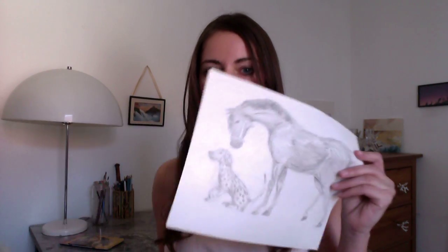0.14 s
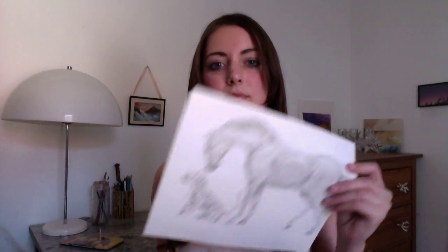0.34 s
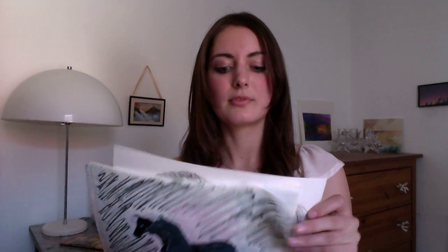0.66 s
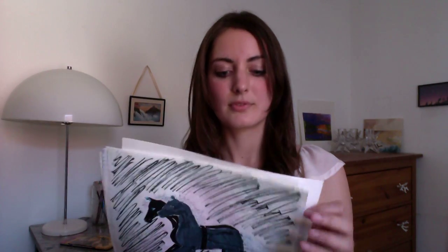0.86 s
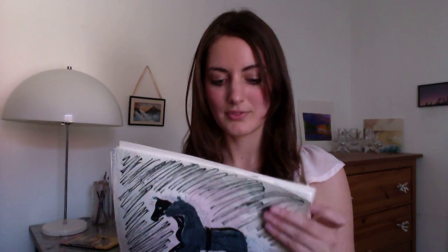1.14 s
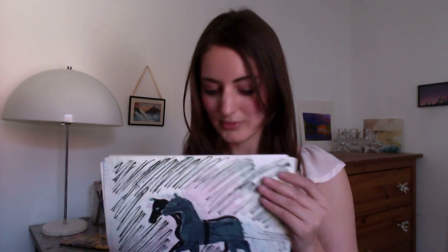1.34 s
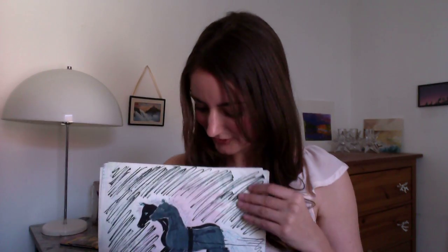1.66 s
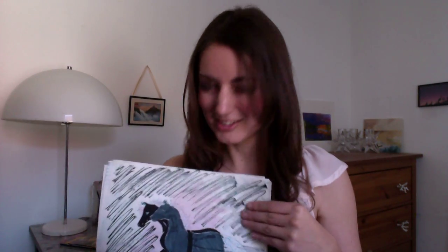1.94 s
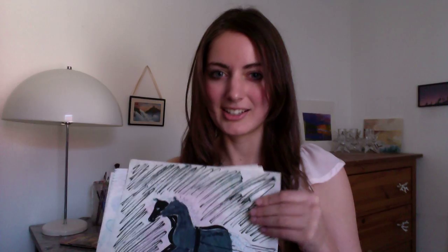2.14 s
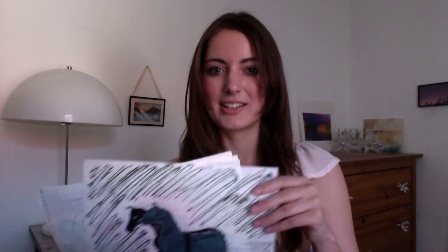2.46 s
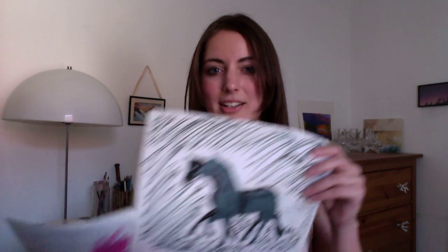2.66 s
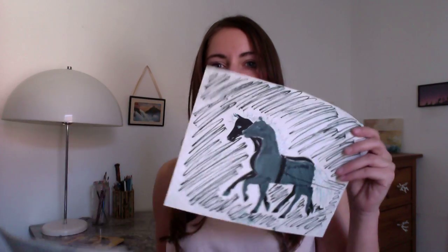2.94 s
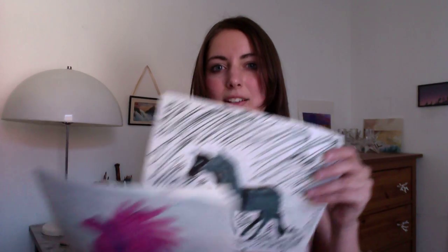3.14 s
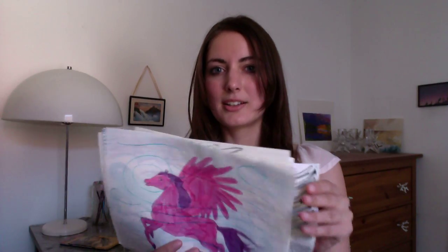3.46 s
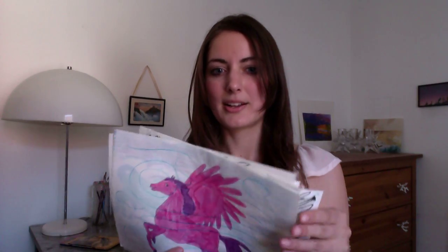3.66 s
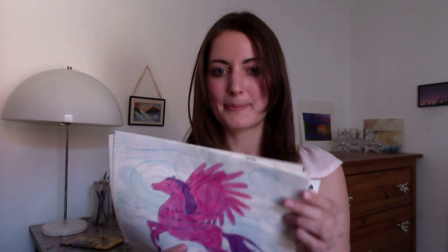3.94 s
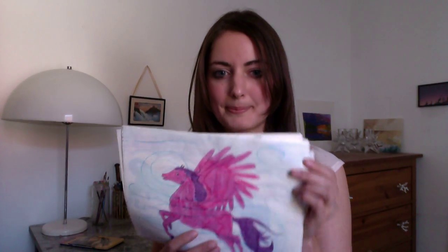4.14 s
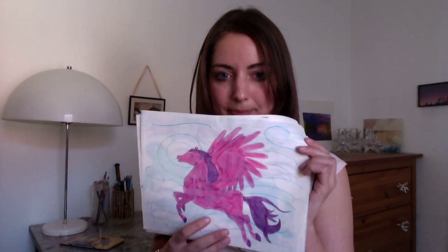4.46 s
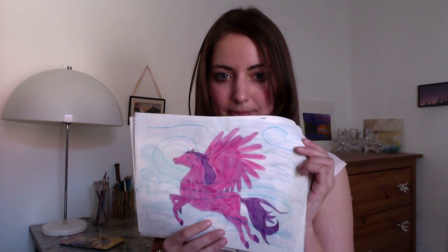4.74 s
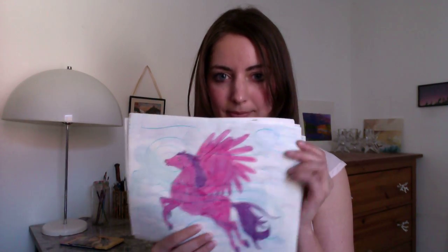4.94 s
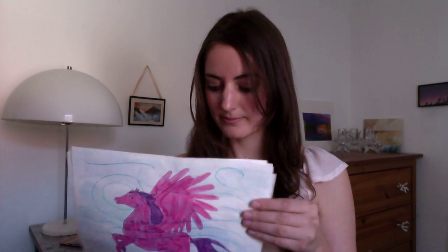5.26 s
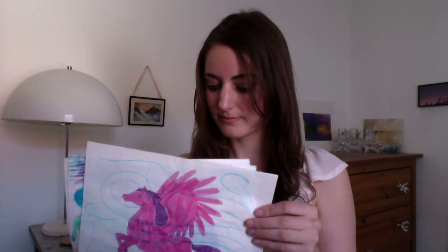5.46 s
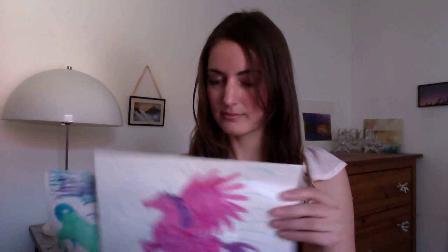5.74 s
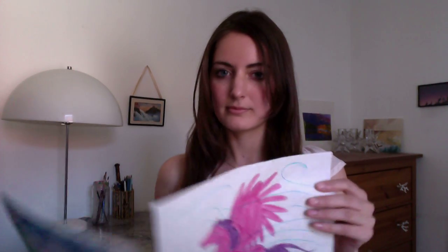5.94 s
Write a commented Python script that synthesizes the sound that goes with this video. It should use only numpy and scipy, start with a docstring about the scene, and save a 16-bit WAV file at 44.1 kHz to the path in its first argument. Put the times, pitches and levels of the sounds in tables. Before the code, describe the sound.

A stack of stiff drawing paper is leafed through by hand near a small computer microphone. Light rustles and ticks come first, then a stronger slide with a sharp, loud snap just before three seconds. Smaller crackles and scuffs follow, a near lull, then longer hissing slides and pops at the end. A faint cooling fan whirs and whines throughout in a small room.

```python
"""Stiff sheets of drawing paper are leafed through by hand, close to a computer microphone in a small room.
Sliding sheets hiss and rustle as bands of tiny random clicks; edges scuff in short bursts of rasping grit.
Buckling sheets snap as one sharp push with a decaying flutter, and one sheet wobbles as a brief low tone.
Underneath, a cooling fan whirs faintly as shaped noise with a drone and a hum, and whines as a thin tone."""
import sys
import numpy as np
from scipy import signal
from scipy.fft import rfft, irfft
from scipy.io import wavfile

SR = 44100
rng = np.random.default_rng(int(sys.argv[2]) if len(sys.argv) > 2 else 0)


def int16_out(signal):
    """Quantize to a 16-bit WAV file."""
    q = np.round(np.clip(np.atleast_2d(signal).T, -1, 1) * 32767)
    wavfile.write(sys.argv[1], SR, q.astype(np.int16))


N = 269010
TIME = np.arange(N) / SR  # s


def undb(db):
    """Decibels to amplitude gain."""
    return 10 ** (np.asarray(db) / 20)


def unit(x):
    """Scale to rms 1."""
    return x / np.sqrt(np.mean(x ** 2) + 1e-20)


def colour(x, points, size=4096):
    """Minimum-phase filter whose response passes through (frequency_hz, level_db) points."""
    hz, db = np.transpose(points)
    grid = np.maximum(np.fft.rfftfreq(size, 1 / SR), 1)
    response_db = np.interp(np.log(grid), np.log(hz), db)
    # folding the cepstrum makes the filter causal
    cepstrum = irfft(np.log(undb(response_db)))
    cepstrum[1:size // 2] *= 2
    cepstrum[size // 2 + 1:] = 0
    impulse = irfft(np.exp(rfft(cepstrum)))
    return signal.fftconvolve(x, impulse)[:len(x)]


def cut(x, hz, kind, order=2):
    """Butterworth low-pass ("low") or high-pass ("high")."""
    edge = min(hz, .45 * SR)
    return signal.sosfilt(signal.butter(order, edge, kind, fs=SR, output="sos"), x)


def resonate(x, hz, width_hz):
    """One resonance, gain 1 at its centre."""
    return signal.lfilter(*signal.iirpeak(hz, hz / width_hz, fs=SR), x)


def walk(rate_hz):
    """Random wander around 0, spread near 1: random knots joined by straight lines."""
    knots = rng.standard_normal(4096)
    return np.interp(TIME * rate_hz, np.arange(len(knots)), knots)


def follow(rows, column):
    """One column of a table, joined by straight lines in time."""
    rows = np.array(rows)
    return np.interp(TIME, rows[:, 0], rows[:, column])


def narrow(hz, width_hz):
    """A narrow band of noise, rms 1, around a pitch that may move."""
    phase = 2 * np.pi * np.cumsum(hz * np.ones(N)) / SR
    sway = cut(rng.standard_normal(N) + 1j * rng.standard_normal(N), width_hz / 2, "low")
    return unit(np.real(sway * np.exp(1j * phase)))


def add(track, sound, start_s):
    """Mix a sound into a track at a time in seconds."""
    i = max(int(start_s * SR), 0)
    track[i:i + len(sound)] += sound[:max(N - i, 0)]


def friction(rate_hz, spread_db, count=N):
    """Fibres catch and let go: dense tiny clicks of uneven size, rms 1."""
    caught = rng.random(count) < rate_hz / SR
    size_db = spread_db * np.minimum(rng.exponential(size=count), 5)
    return unit(caught * rng.standard_normal(count) * undb(size_db))


ROOM_T60_S, ROOM_TREBLE_T60_S, ROOM_DB = .17, 0.16, -6


def room(x, gap_s=0.0075, split_hz=5500, treble_db=-5, count=16000):
    """Desk and walls answer after a few milliseconds with decaying noise; the treble dies a little sooner."""
    t, noise = np.arange(count) / SR, rng.standard_normal(count)
    low = cut(noise, split_hz, "low") * undb(-60 * t / ROOM_T60_S)
    high = cut(noise, split_hz, "high") * undb(-60 * t / ROOM_TREBLE_T60_S)
    tail = (low - undb(treble_db) * high) * (t > gap_s)
    # scale the tail's energy to the share of the spectrum below the split
    tail *= np.sqrt(2 * split_hz / SR / np.sum(tail ** 2))
    return x + undb(ROOM_DB) * signal.fftconvolve(x, tail)[:N]


# spectrum of the fan's air noise, in relative level: frequency_hz, level_db
AIR_SPECTRUM = [(25, -55), (60, -19), (110, -7.5), (230, -3.5), (300, -9), (530, -11), (1020, -7),
                (1650, -8), (2220, -19.5), (3340, -21.5), (4030, -19), (7500, -27), (10000, -35.5),
                (16000, -65)]
# resonances in the fan's air, rms before the shared waver: pitch_hz, width_hz, level_db
FAN_RESONANCES = [(1647, 105, -82.5), (1722, 500, -69.5), (3275, 380, -69)]
# the fan's drifting low drone, level before the shared waver: time_s, pitch_hz, level_db
DRONE_PATH = [(0, 175, -78), (.6, 187.5, -68), (1.4, 190, -62.5), (1.85, 209.3, -80), (2.3, 222, -66),
              (3.4, 231, -63.5), (3.95, 223, -72), (4.6, 221.8, -67.5), (6.1, 216.5, -67.5)]
AIR_DB = -61  # rms before the shared waver
HUM_HZ, HUM_DB = 129.5, -76.5  # resting level, before the swell and the shared waver
HUM_SWELL_S, HUM_SWELL_HALF_S, HUM_SWELL_DB = 5.4, 0.19, 13  # the hum swells once
WHINE_HZ, WHINE_DB = 1634, -66  # centres of a small drift and waver


def fan(waver_db=2.5, whine_waver_db=1.0, whine_drift_hz=4):
    """Steady air noise with a low drone, a hum and a thin whine from the blades."""
    air = undb(AIR_DB) * unit(colour(rng.standard_normal(N), AIR_SPECTRUM))
    for hz, width_hz, db in FAN_RESONANCES:
        air += undb(db) * narrow(hz, width_hz)
    drone = undb(follow(DRONE_PATH, 2)) * narrow(follow(DRONE_PATH, 1), width_hz=28.3)
    swell = np.exp(-((TIME - HUM_SWELL_S) / HUM_SWELL_HALF_S) ** 2)
    hum = undb(HUM_DB + HUM_SWELL_DB * swell) * narrow(HUM_HZ, width_hz=16)
    whir = (air + drone + hum) * undb(waver_db * walk(2.767))
    blade_cycles = np.cumsum(WHINE_HZ + whine_drift_hz * walk(20)) / SR
    whine = unit(np.sin(2 * np.pi * blade_cycles)) * undb(WHINE_DB + whine_waver_db * walk(12))
    return whir + whine


# one bowed sheet wobbles: centre_s, pitch_hz, peak_db, half_length_s (to 1/e of the peak)
BOWED_SHEET = (2.085, 271, -36.5, .017)


def wobble():
    """A low bending mode swings for a few cycles: a sine under a bell-shaped swell."""
    centre_s, hz, peak_db, half_s = BOWED_SHEET
    age = TIME - centre_s
    return undb(peak_db) * np.sin(2 * np.pi * hz * age) * np.exp(-(age / half_s) ** 2)


# resonances of a held sheet, relative to the push (sliding makes them waver): pitch_hz, width_hz, level_db
SHEET_MODES = [(377.5, 21, 2.5), (550, 110, -4.5), (1185, 23, -5), (1358, 45, 6), (2380, 380, -11),
               (3550, 270, -4)]


def sheet(x):
    """The sheet radiates each push and rings a little."""
    return x + sum(undb(db) * resonate(x, hz, width_hz) for hz, width_hz, db in SHEET_MODES)


# spectrum of the snapping push, in relative level: frequency_hz, level_db
SNAP_SPECTRUM = [(150, -15.5), (350, 8.5), (700, 5.5), (1150, 4.5), (1700, 1.5), (2700, 6.5), (3500, 0),
                 (4800, -3), (7000, -6), (8500, -8), (9700, 6), (11000, -5), (16000, -6)]
# a sheet buckles, level before the room (the 2.819 s row is the bright flutter tail of the snap at 2.8116 s):
# start_s, level_db, bass_corner_hz, treble_corner_hz, decay_s, patch_pitch_hz, patch_share_db
BUCKLES = [(0.0764, -43.5, 500, 2830, 0.0059, 1980, -9), (0.653, -42.5, 400, 5500, 0.0016, 4400, 0),
           (0.857, -44, 400, 3500, 0.0027, 2080, 6), (0.871, -41.5, 352, 2180, 0.0037, 575, 7),
           (1.267, -44.5, 500, 4000, 0.0036, 694, 6), (1.3093, -43, 400, 13000, 0.0055, 630, 2),
           (2.3834, -31.5, 634, 1550, 0.0017, 776, 8), (2.551, -41, 398, 3000, .003, 1314, -7),
           (2.5807, -26, 715, 3310, 0.0074, 1180, -16), (2.7875, -30.5, 794, 3880, 0.0054, 2410, -14),
           (2.8116, -17, 360, 9900, 0.0026, 3080, 1.5), (2.819, -30.5, 1200, 6810, 0.0064, 5370, 1),
           (3.217, -40.5, 700, 3030, 0.0035, 2820, -5), (3.598, -33.5, 1900, 5000, 0.0014, 2604, 11),
           (3.7574, -40.5, 507, 8850, 0.0023, 1410, -16), (3.9264, -46, 1190, 2730, 0.0023, 2040, 7),
           (4.2155, -30.5, 1700, 5650, .0022, 4300, 10), (4.4096, -34, 1702, 2790, 0.0024, 2130, 23),
           (5.231, -42, 1014, 5000, .001, 2500, 0), (5.242, -41.5, 1500, 7000, 0.0013, 3300, -16),
           (5.6325, -40, 350, 4000, 0.0019, 594, -5), (5.642, -37, 590, 4000, .0016, 1300, -19),
           (5.6933, -29, 755, 4270, 0.0034, 3940, -4), (5.698, -39.5, 907, 5000, 0.0069, 4130, -2),
           (5.748, -44, 350, 2000, 0.0094, 600, -3), (5.9806, -32, 905, 2290, 0.0043, 1330, -5),
           (6.0965, -33, 1210, 3270, 0.008, 2100, -2)]
FLUTTER = .24  # noise after the push, against the push itself


def snaps(count=4096, patch_q=5):
    """A kink flips through the sheet: one sharp push, then bending waves that die in milliseconds."""
    out, t = np.zeros(N), np.arange(count) / SR
    for start_s, db, bass_hz, treble_hz, decay_s, patch_hz, patch_db in BUCKLES:
        push = FLUTTER * rng.standard_normal(count) * np.exp(-t / decay_s)
        push[0] += 1
        # the flipping patch has its own pitch
        push = push + undb(patch_db) * resonate(push, patch_hz, patch_hz / patch_q)
        crack = sheet(colour(push, SNAP_SPECTRUM))
        crack = cut(cut(crack, bass_hz, "high"), treble_hz, "low", order=3)
        # same energy as a plain decay that starts at the given level
        crack = crack * np.sqrt(decay_s * SR / 2 / np.sum(crack ** 2))
        add(out, undb(db) * crack, start_s)
    return out


# spectrum of an edge's grit, in relative level: frequency_hz, level_db
SCUFF_SPECTRUM = [(200, -38), (550, -4.5), (1000, -2), (1700, -4), (2200, 3.5), (3000, -0.5), (4200, -0.5),
                  (5200, -7), (7200, -4), (8700, -9), (9700, -1), (16000, -5)]
# an edge scuffs the stack, level at the peak and before the room:
# peak_s, level_db, rise_s, fade_s, treble_corner_hz, rasp_pitch_hz, rasp_share_db
EDGE_SCUFFS = [(.657, -54.5, 0.013, .012, 9000, 4340, 7), (.857, -57.5, 0.0077, .03, 4000, 1310, 35),
               (2.053, -51.5, 0.0041, 0.099, 5000, 2530, 3), (2.09, -49, 0.013, 0.053, 4800, 3840, 2),
               (2.49, -43, 0.034, 0.032, 6100, 4200, 33), (2.505, -44, 0.0091, 0.022, 6040, 3440, 22),
               (2.722, -42.5, 0.024, 0.016, 15050, 4300, 8), (3.305, -52, 0.0028, .013, 14000, 9900, 0),
               (3.595, -51, 0.0022, 0.0074, 11000, 7200, 18),
               (3.764, -45.5, 0.0047, 0.027, 10700, 3865, -1), (4.209, -42, 0.0038, 0.034, 3520, 2080, 8),
               (4.219, -41.5, 0.0024, 0.021, 5300, 5200, 6), (4.258, -43.5, .013, .02, 3980, 2600, -4),
               (4.385, -49, 0.018, 0.01, 6300, 7460, 4), (4.417, -46.5, 0.0015, 0.015, 3200, 2100, -3)]


def scuffs(count=12000, rasp_q=6):
    """Short bursts of friction that swell and fade; the edge chatters near one pitch."""
    out, t = np.zeros(N), np.arange(count) / SR
    for peak_s, db, rise_s, fade_s, treble_hz, rasp_hz, rasp_db in EDGE_SCUFFS:
        grit = colour(friction(rate_hz=9000, spread_db=3.0, count=count), SCUFF_SPECTRUM)
        grit = grit + undb(rasp_db) * resonate(grit, rasp_hz, rasp_hz / rasp_q)
        grit = unit(cut(grit, treble_hz, "low", order=3))
        age = t - 2 * rise_s
        swell = np.exp(-(np.minimum(age, 0) / rise_s) ** 2 - np.maximum(age, 0) / fade_s)
        add(out, undb(db) * swell * grit, peak_s - 2 * rise_s)
    return out


# a sheet slides over its neighbour, levels before the pressure, trim and judder in sliding():
# start_s, length_s, fibre_hiss_db, sheet_rustle_db
SLIDES = [(-.02, 0.038, -52, -57), (.045, 0.02, -58, -57), (0.484, 0.03, -61.5, -62),
          (0.604, 0.021, -63, -59), (0.625, 0.13, -58, -59), (0.807, 0.078, -56.5, -55.5),
          (1.089, 0.12, -57.5, -61.5), (1.30, 0.032, -62, -67), (1.384, 0.023, -66, -60),
          (1.946, 0.047, -62.5, -64), (1.993, 0.16, -55.5, -54.5), (2.142, 0.054, -61, -59.5),
          (2.23, 0.27, -57.5, -62), (2.331, 0.068, -49.5, -52), (2.422, 0.35, -45, -52.5),
          (2.618, 0.14, -43.5, -55), (2.797, 0.027, -75, -43), (3.16, 0.017, -65, -70),
          (3.34, 0.022, -57, -56), (3.538, 0.051, -59, -58), (3.645, 0.011, -59, -75),
          (3.787, 0.037, -59, -70), (3.913, 0.13, -60, -63), (4.04, 0.22, -73.5, -68),
          (4.231, 0.044, -57, -55.5), (4.348, 0.043, -62, -56), (4.98, 0.044, -63, -68),
          (5.056, .06, -60, -75), (5.178, 0.058, -59, -70), (5.257, 0.19, -50, -61),
          (5.388, 0.038, -57, -53), (5.555, 0.33, -48.5, -55), (5.607, 0.052, -49, -53),
          (5.766, 0.072, -45, -51.5), (5.849, 0.055, -46, -58)]
# faint rustle of the held stack, never quite still, before the same trim and judder: time_s, level_db
HELD_STACK = [(0, -63), (.4, -70.5), (1.3, -59.5), (1.85, -69.5), (2.8, -64.5), (3.6, -63.5), (4.3, -57.5),
              (4.75, -70.5), (5.5, -59), (6.1, -61.5)]
HELD_HISS_DB = -23.5  # its hiss against its rustle, before the creep
STROKE_ATTACK_S, ATTACK_SHARE = .022, .22  # a fixed time plus a share of the stroke's length
HISS_RELEASE_S, RUSTLE_RELEASE_S = 0.019, 0.044


def stroking(creep_db=3):
    """Hiss and rustle levels: strokes gather speed and die away; the held sheets creep in between."""
    held = undb(follow(HELD_STACK, 1))
    hiss_power = (held * undb(HELD_HISS_DB + creep_db * walk(14))) ** 2
    rustle_power = held ** 2
    for start_s, length_s, hiss_db, rustle_db in SLIDES:
        age = TIME - start_s
        attack_s = STROKE_ATTACK_S + ATTACK_SHARE * length_s
        speed = np.sin(np.pi / 2 * np.clip(age / attack_s, 0, 1)) ** 2
        stopped = np.maximum(age - length_s, 0)
        hiss_power = hiss_power + (undb(hiss_db) * speed * np.exp(-stopped / HISS_RELEASE_S)) ** 2
        rustle_power = rustle_power + (undb(rustle_db) * speed * np.exp(-stopped / RUSTLE_RELEASE_S)) ** 2
    return np.sqrt(hiss_power), np.sqrt(rustle_power)


# spectrum of the fibres' hiss, in relative level: frequency_hz, level_db
HISS_SPECTRUM = [(2500, -43), (3400, -8), (4200, 0.5), (4900, -7.5), (5600, -7.5), (6400, 0), (7300, 0.5),
                 (8100, -4.5), (8900, -3), (9600, 4), (10400, 0), (11400, -2.5), (13000, -2.5),
                 (15800, -13.5)]
# spectrum of the whole sheet's rustle, in relative level: frequency_hz, level_db
RUSTLE_SPECTRUM = [(120, -26.5), (230, 2.5), (400, -5.5), (700, 2), (1300, -5), (2000, 1.5), (2600, -1),
                   (3000, 0), (4100, -3), (5000, -10), (7200, -9.5), (9000, -34)]
# bands of hiss favoured by the gap between sheets, level before the sway: pitch_hz, width_hz, level_db
GAP_BANDS = [(4160, 220, -25), (6900, 300, 13), (9700, 1100, 10.5)]


def sliding(grain_db=1.2, rustle_trim_db=-1, judder_db=1.27, bend_db=2.0,
            fine_hz=9000, firm_db=-45, coarsening=0.31, gap_sway=0.088):
    """Fine hiss and coarser rustle; the resonances come and go as the sheet bends."""
    hiss_level, rustle_level = stroking()
    fibres = unit(colour(friction(rate_hz=20000, spread_db=grain_db), HISS_SPECTRUM))
    fibres = fibres + sum(gap_sway * undb(db) * walk(18) * resonate(fibres, hz, width_hz)
                          for hz, width_hz, db in GAP_BANDS)
    # filtered forwards and backwards, so the finest hiss keeps its timing
    fine = cut(fibres, fine_hz, "high", order=8)
    fine = cut(fine[::-1], fine_hz, "high", order=8)[::-1]
    # a light touch gives mostly the finest hiss, a firm one also the lower part
    pressure = (hiss_level / undb(firm_db)) ** coarsening * undb(bend_db * walk(24.96) / 2)
    hiss = (fine + pressure * (fibres - fine)) * hiss_level

    slips = colour(friction(rate_hz=4500, spread_db=2.0), RUSTLE_SPECTRUM)
    ringing = sum(undb(db + bend_db * walk(11)) * resonate(slips, hz, width_hz)
                  for hz, width_hz, db in SHEET_MODES)
    rustle = unit(slips + ringing) * rustle_level * undb(rustle_trim_db)
    return (hiss + rustle) * undb(judder_db * walk(70))


def scene():
    """Paper in the room, over the fan; the wobble fans air straight at the microphone."""
    paper = room(sliding() + scuffs() + snaps())
    return (paper + wobble() + fan())[None]


def record(dry, bass_hz=45, top_hz=15800):
    """The small microphone loses the deep bass; the recorder cuts the top steeply."""
    microphone = cut(dry, bass_hz, "high")
    return signal.sosfilt(signal.ellip(12, .2, 80, top_hz, fs=SR, output="sos"), microphone)


dry = scene()
out = record(dry)
int16_out(out)
```